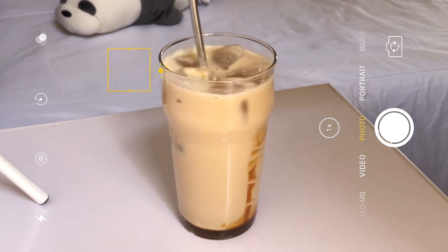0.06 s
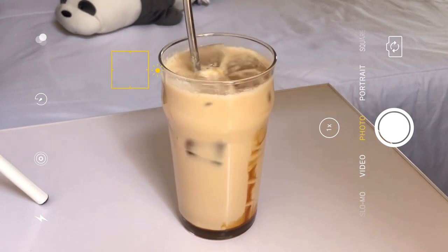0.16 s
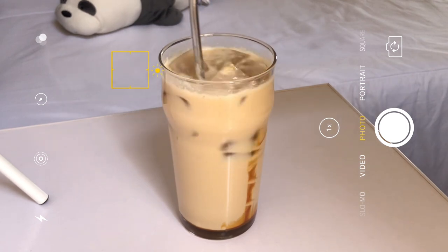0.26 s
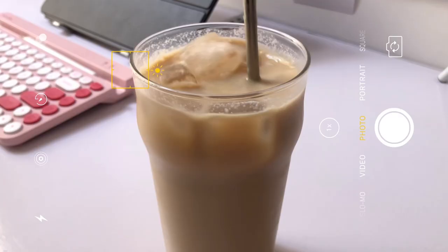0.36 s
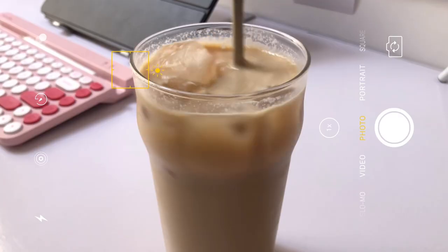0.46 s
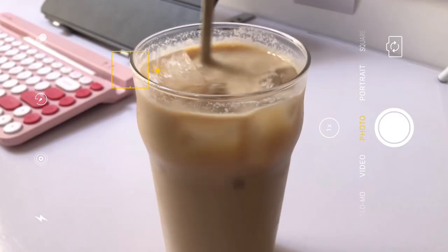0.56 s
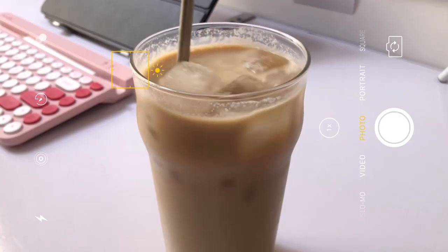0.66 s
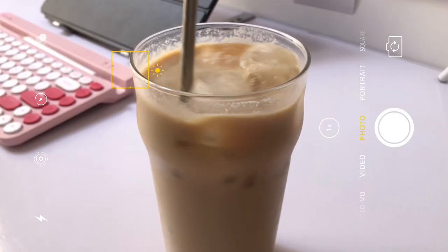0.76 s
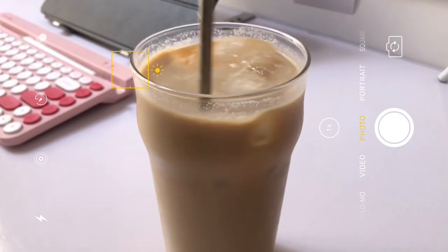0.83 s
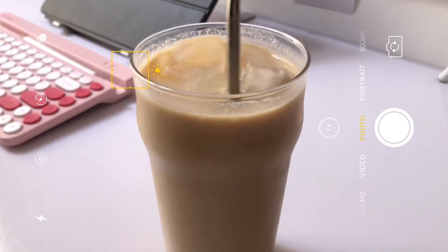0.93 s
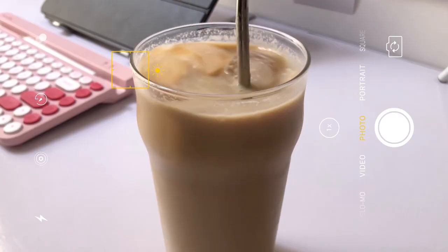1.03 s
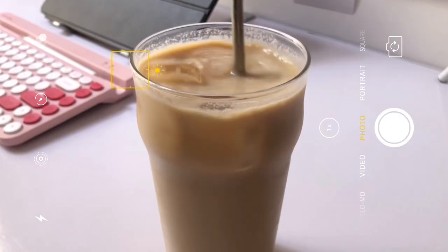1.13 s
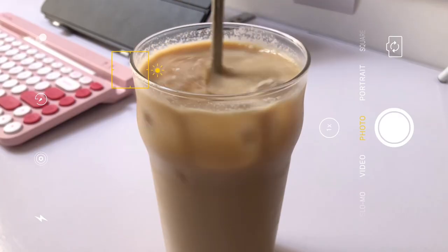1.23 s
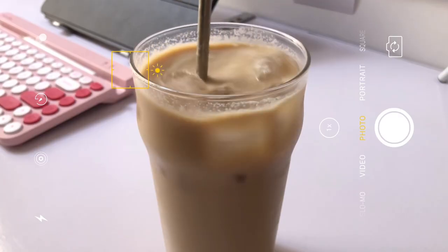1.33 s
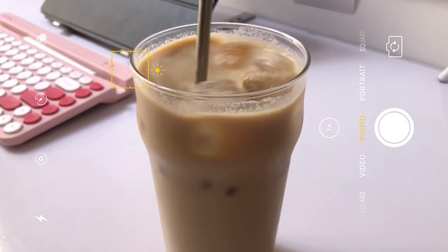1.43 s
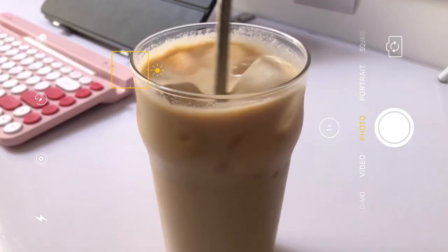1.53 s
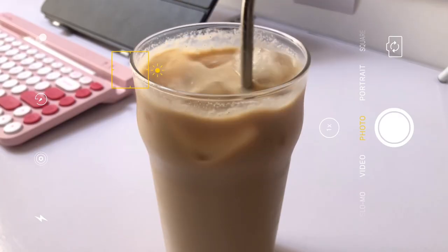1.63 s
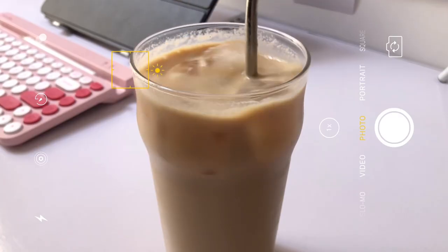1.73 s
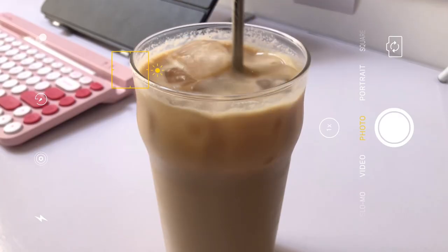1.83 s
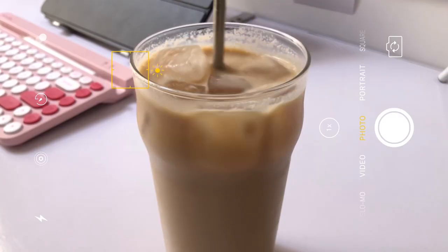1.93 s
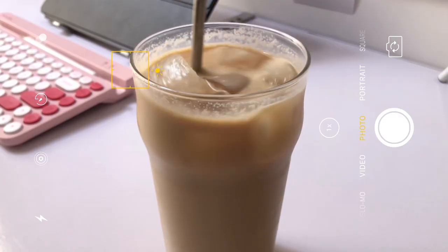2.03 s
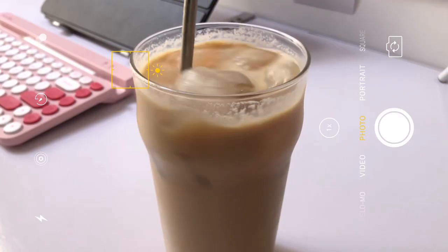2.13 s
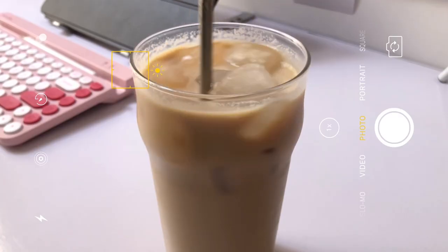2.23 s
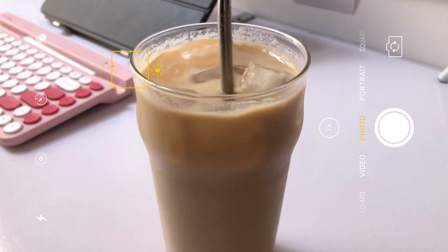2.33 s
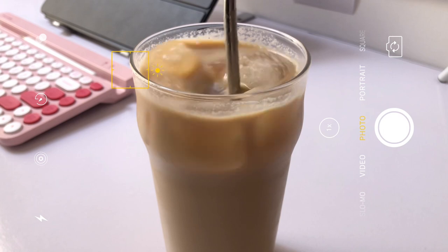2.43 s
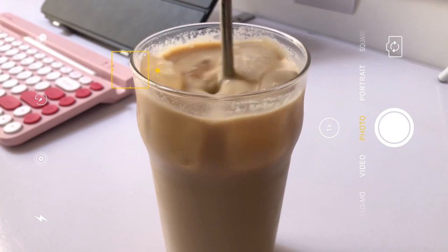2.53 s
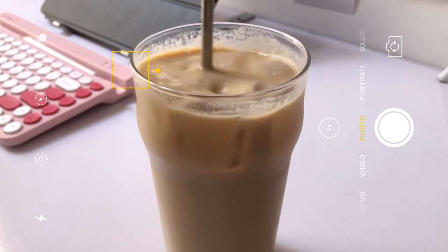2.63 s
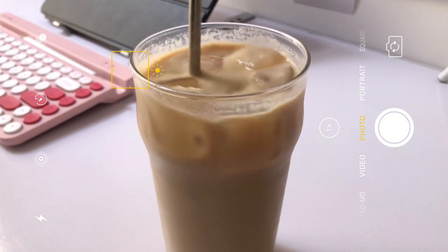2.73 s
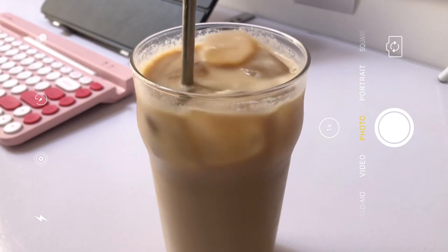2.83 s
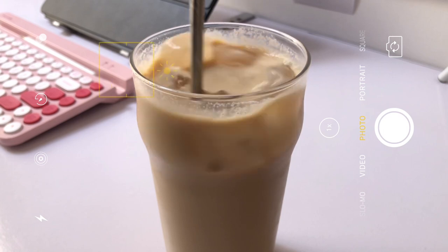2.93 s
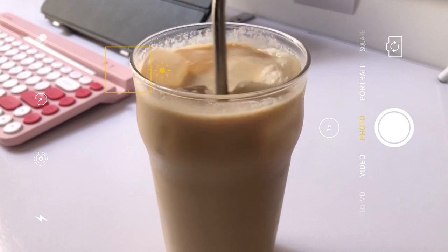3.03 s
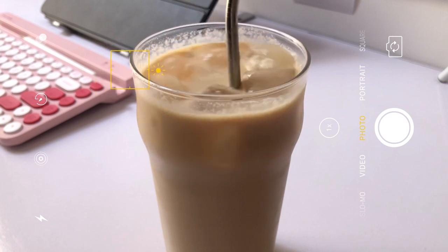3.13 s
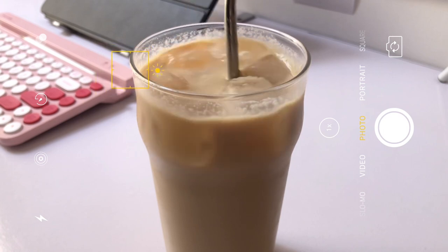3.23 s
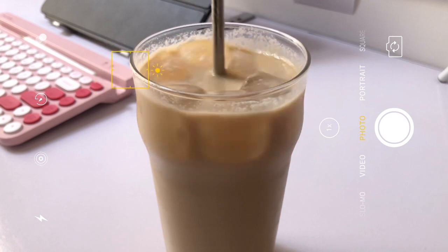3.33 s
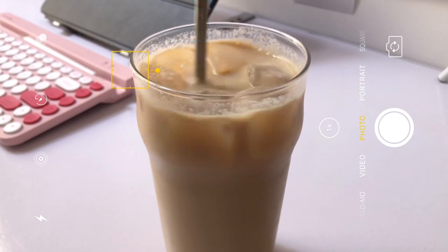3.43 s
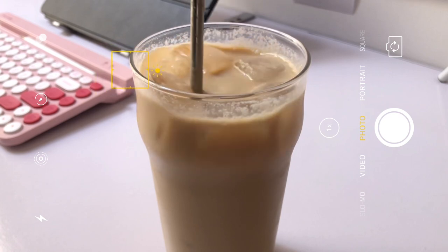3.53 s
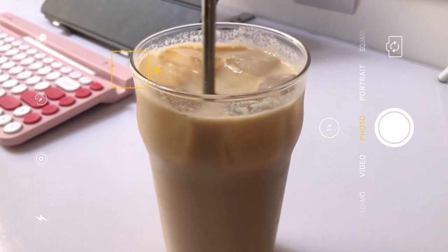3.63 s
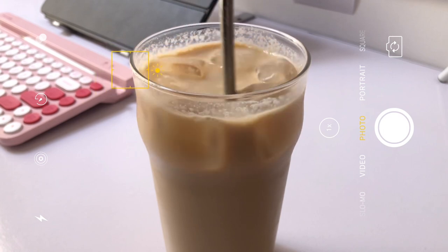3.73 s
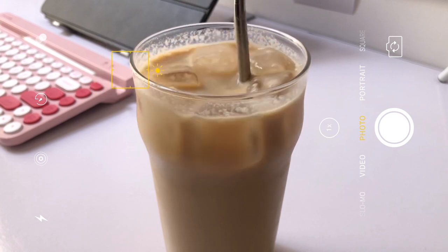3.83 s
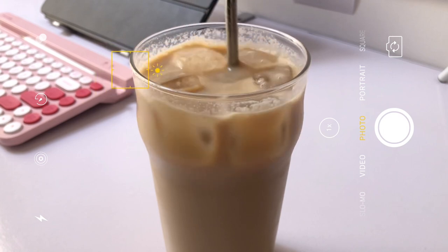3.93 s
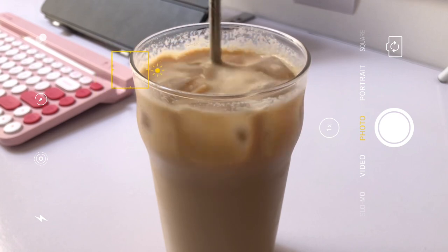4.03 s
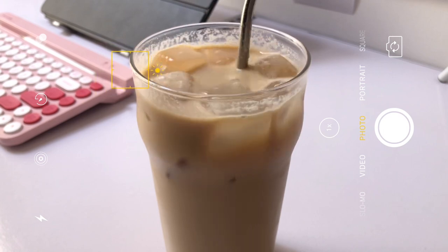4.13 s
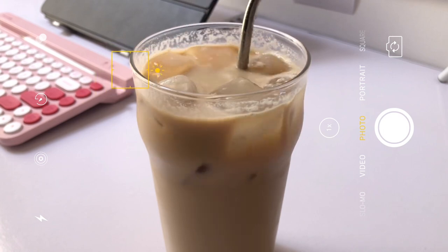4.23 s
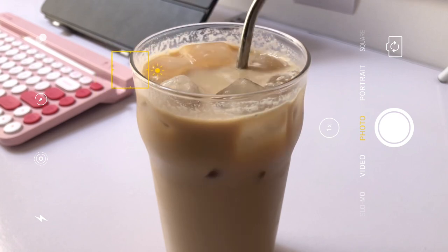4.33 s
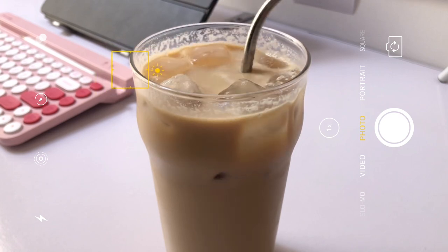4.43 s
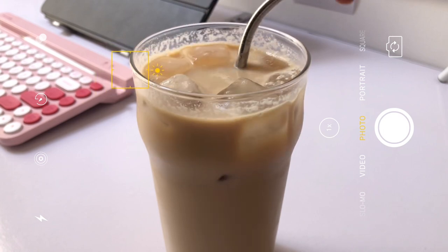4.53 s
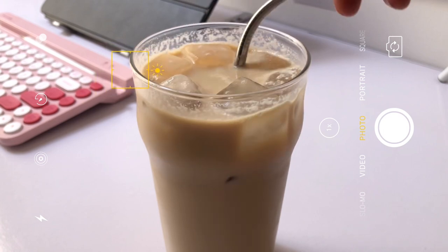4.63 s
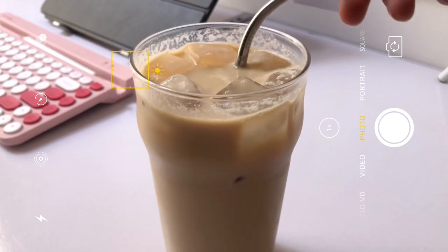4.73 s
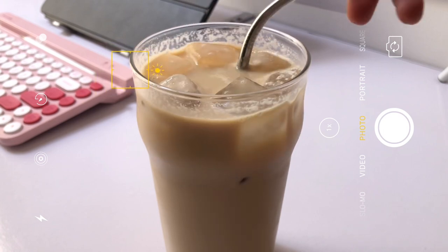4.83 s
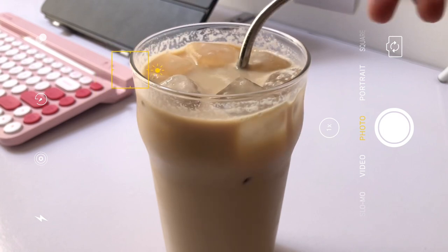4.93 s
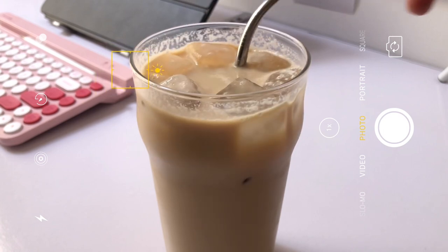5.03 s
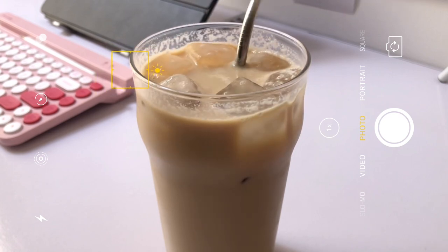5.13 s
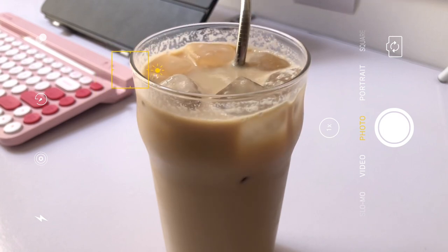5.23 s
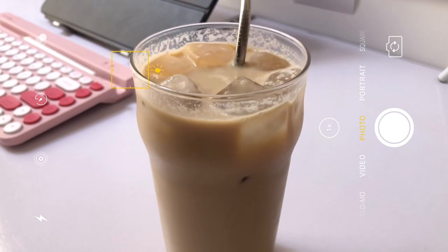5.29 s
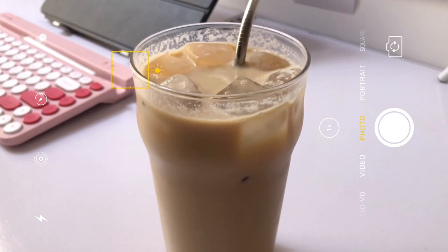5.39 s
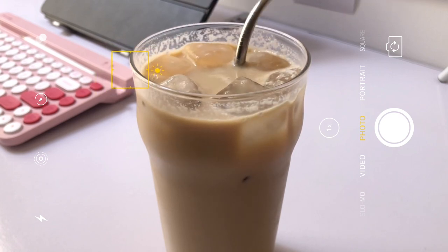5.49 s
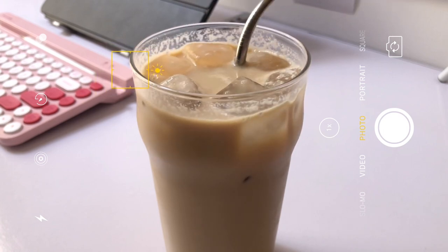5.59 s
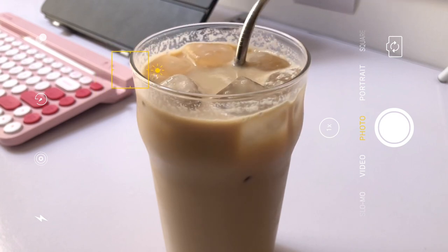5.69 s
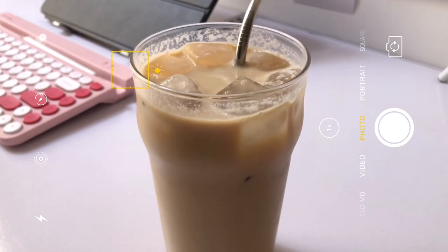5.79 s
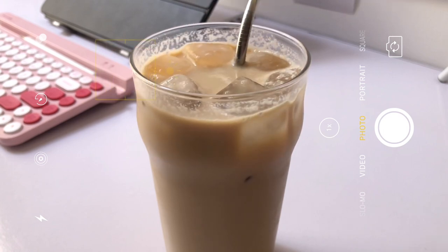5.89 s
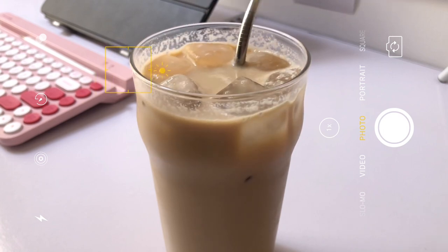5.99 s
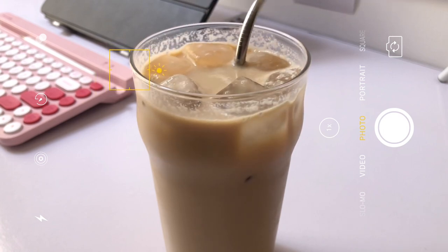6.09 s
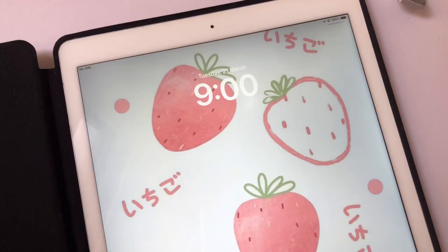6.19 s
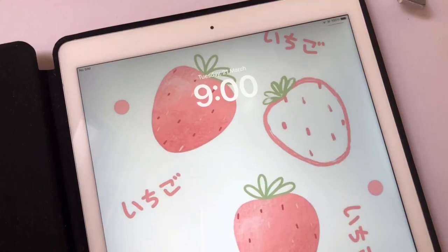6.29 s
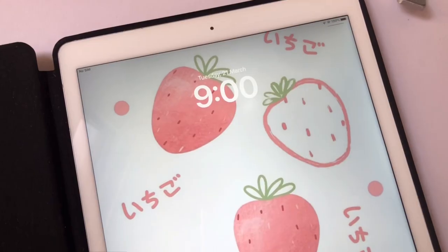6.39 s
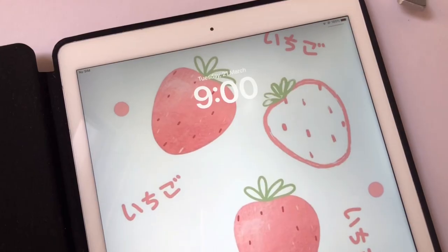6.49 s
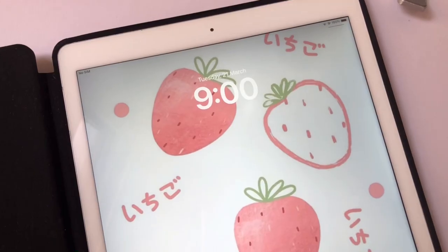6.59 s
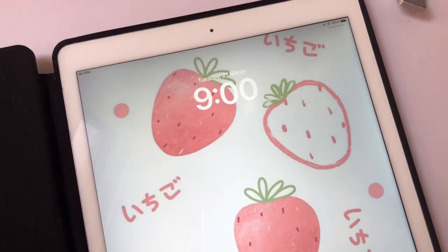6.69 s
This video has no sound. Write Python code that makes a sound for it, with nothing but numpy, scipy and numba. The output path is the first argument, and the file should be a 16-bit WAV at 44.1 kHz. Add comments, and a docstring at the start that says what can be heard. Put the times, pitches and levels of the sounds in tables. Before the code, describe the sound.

Close, crisp ice and straw clicks against a full glass, with light slosh and dull desk bumps, ending in quiet room air.

```python
"""On a desk in a quiet room, a metal straw stirs ice cubes in a full glass of milky coffee.
Each knock is a noisy crack of short modes plus the damped modes of glass, liquid and straw.
Harder shoves ring the desk; faint touches, filtered slips and noise make jostle, scrape and slosh.
The level dips briefly near 0.39 s, where the pitch of the hollow steps down.
The stirring stops, filtered noise brushes and squeaks as fingers do, and steady air remains."""
import sys
import numpy as np
from scipy import signal
from scipy.fft import rfft, irfft
from scipy.io import wavfile
from scipy.ndimage import uniform_filter1d
from numba import njit

SR = 44100
rng = np.random.default_rng(int(sys.argv[2]) if len(sys.argv) > 2 else 0)


def how_loud(loudness_db):
    """Turn decibels into a plain amplitude multiplier (0 dB gives 1, 20 dB gives 10)."""
    steps = np.asarray(loudness_db, float) / 20
    return 10 ** steps


def put_to_file(sound):
    """Save the sound as 16-bit audio at rate SR, in the file named by the first command-line argument."""
    columns = np.atleast_2d(sound).T  # one column per channel
    safe = np.clip(columns, -1, 1)
    whole_steps = np.round(safe * 32767)
    wavfile.write(sys.argv[1], SR, whole_steps.astype(np.int16))


N = 297671
T = np.arange(N) / SR


def curve(s, v, off=-120.):
    """Linear interpolation: a control curve at every sample, at the level off outside its span."""
    return np.interp(T, s, v, left=off, right=off)


def coloured(shape):
    """Spectral shaping: noise of rms 1 whose spectrum follows (frequency [Hz], relative level [dB])."""
    hz, db = np.transpose(shape)
    f = np.maximum(np.fft.rfftfreq(N, 1 / SR), 1)
    gain = how_loud(np.interp(np.log(f), np.log(hz), db, left=-80, right=-80))
    x = irfft(rfft(rng.standard_normal(N)) * gain, N)
    return x / np.std(x)


def walk(rate):
    """Slow random modulation: levels held for 1 / rate s, then smoothed twice; spread near 1."""
    k = int(SR / rate)
    held = np.repeat(rng.standard_normal(N // k + 1), k)
    return 1.5 * uniform_filter1d(uniform_filter1d(held, k), k)[:N]


@njit
def rings(s, hz, gain, t60, n, sr):
    """Modal superposition: a sum of damped sines, each starting at its own moment."""
    out = np.zeros(n)
    for j in range(len(s)):
        p = np.exp(2j * np.pi * hz[j] / sr - np.log(1000) / (t60[j] * sr))
        z, i0 = gain[j] + 0j, int(s[j] * sr)
        for i in range(i0, min(n, i0 + int(t60[j] * sr))):
            out[i] += z.imag
            z *= p
    return out


@njit
def sweep(x, hz, q, sr):
    """Resonance with a moving centre: a state-variable band-pass."""
    y, b, l = np.empty(len(x)), 0., 0.
    for i in range(len(x)):
        g = np.tan(np.pi * hz[i] / sr)
        v = (b + g * (x[i] - l)) / (1 + g * (g + 1 / q))
        b, l, y[i] = 2 * v - b, l + 2 * g * v, v / q
    return y


def band(x, hz, q):
    """Resonant filtering: band-passed sound brought back to rms 1."""
    y = sweep(x, hz + np.zeros(N), q, float(SR))
    return y / np.std(y)


def strike(s, hz, db, t60, scatter_db, detune, lag_s=0., unison=0.):
    """Modal excitation: blows (rows) ring modes (columns); contact varies sign, level, tuning and lag."""
    hz, db, t60 = np.broadcast_arrays(hz, db, t60)
    u = rng.standard_normal(hz.shape + (4,))
    start = s[:, None] + lag_s * np.abs(u[..., 3])
    hz = np.clip(hz * (1 + detune * u[..., 0]), 30, .45 * SR)
    # a larger unison gives more modes the same sign
    gain = how_loud(db + scatter_db * u[..., 1]) * np.sign(u[..., 2] + unison)
    return rings(start.ravel(), hz.ravel(), gain.ravel(), t60.ravel() + 0., N, float(SR))


# blows of straw and ice on the glass: (time [s], relative crack level [dB], crack centre [Hz],
# relative wall level [dB], wall pitch [Hz], relative bowl level [dB])
KNOCK_BLOWS = [(0.0094, -54, 4590, -53, 2620, -53), (0.0224, -52, 4900, -52, 2950, -53),
               (0.0434, -37.5, 5080, -47.5, 3050, -45), (0.0535, -40, 8090, -45.5, 3230, -50),
               (0.1238, -37.5, 5470, -39, 3000, -45.5), (0.1331, -31, 5170, -56, 3230, -67),
               (0.1896, -37.5, 5260, -42, 3030, -50.5), (0.2106, -43, 4200, -45, 2910, -53),
               (0.2892, -60, 4840, -64, 2980, -52), (0.4297, -52, 4840, -55, 2950, -56.5),
               (0.4584, -32.5, 6200, -42, 3060, -54), (0.4823, -39.5, 6270, -38, 2990, -50),
               (0.5192, -48, 4320, -48, 2930, -61), (0.5357, -38, 6340, -40.5, 3000, -57),
               (0.5594, -17, 7560, -47, 3070, -47.5), (0.5901, -45, 7700, -40.5, 3030, -57),
               (0.6954, -42.5, 4750, -50.5, 3080, -58), (0.7018, -35.5, 4850, -52.5, 2980, -55.5),
               (0.7213, -44, 4280, -57, 2990, -60), (0.7324, -48, 6200, -63, 3220, -67),
               (0.7662, -44, 6400, -42.5, 2940, -60), (0.9108, -52, 6400, -60, 3050, -61.5),
               (1.0635, -48, 6200, -47, 2940, -58), (1.0766, -44.5, 6330, -43, 2970, -55),
               (1.0794, -35.5, 4170, -42.5, 3090, -53), (1.0939, -42, 6200, -43, 2940, -56),
               (1.1333, -40.5, 4600, -35, 2775, -55), (1.1478, -31.5, 4260, -41, 2850, -52),
               (1.1603, -35.5, 6060, -34.5, 2930, -46.5), (1.1862, -38, 4250, -40, 2950, -47),
               (1.29, -50.5, 4750, -46.5, 2850, -63), (1.3276, -51, 5450, -47, 3300, -55),
               (1.3319, -41, 5100, -41.5, 3060, -53), (1.4172, -37, 4240, -46, 3130, -55),
               (1.4267, -34.5, 4180, -43, 2920, -52), (1.4386, -24.5, 5860, -34.5, 2950, -52),
               (1.4568, -39, 6420, -41, 3020, -54), (1.473, -40, 4200, -41.5, 3050, -60),
               (1.4914, -37.5, 4260, -44, 2850, -71), (1.502, -36.5, 6850, -44.5, 3220, -60),
               (1.5105, -34, 6450, -46.5, 3030, -54), (1.5499, -17, 8350, -38.5, 3070, -48),
               (1.5713, -34.5, 4400, -40, 2940, -51), (1.6084, -41, 4400, -44.5, 2860, -51.5),
               (1.6328, -32, 4330, -34.5, 2975, -46.5), (1.6586, -47, 4230, -46.5, 2990, -57),
               (1.7001, -40, 4700, -50, 2910, -60), (1.7215, -34, 4600, -41.5, 3060, -56),
               (1.7669, -44, 4750, -45, 3070, -53), (1.7838, -44, 4270, -39.5, 3000, -50.5),
               (1.8287, -37, 4300, -41.5, 3010, -53), (1.9205, -34, 6270, -37.5, 3114, -54.5),
               (2.1034, -41.5, 6600, -46.5, 3010, -52.5), (2.1136, -33.5, 4540, -47, 3020, -65),
               (2.2363, -34, 6000, -62, 3260, -66), (2.385, -34.5, 6000, -48, 2930, -52.5),
               (2.4234, -52, 4250, -51, 2850, -53.5), (2.4848, -25, 4770, -29, 3070, -42.5),
               (2.4974, -43, 5500, -43, 2910, -56), (2.5107, -38, 4510, -38.5, 2830, -50),
               (2.5247, -19, 4540, -27.5, 3125, -43.5), (2.54, -39, 4610, -41.5, 2980, -49),
               (2.5591, -36, 4500, -39.5, 2980, -47), (2.617, -37, 4930, -55, 3080, -59),
               (2.6214, -29, 6400, -33.5, 2950, -48), (2.6489, -46, 5770, -39, 3090, -46.5),
               (2.6709, -27.5, 5940, -34.5, 2480, -46.5), (2.6848, -32, 4430, -35, 3130, -52.5),
               (2.6884, -28.5, 4220, -32, 3005, -58), (2.7004, -41, 4290, -50, 2870, -50),
               (2.7174, -49, 6140, -45, 2820, -48), (2.7752, -33.5, 4230, -40.5, 2970, -55),
               (2.862, -46, 4230, -45.5, 3000, -71), (2.9138, -54, 6320, -69, 2760, -67),
               (2.9277, -27.5, 6740, -50, 2640, -65), (2.9374, -44, 5550, -46.5, 2650, -52),
               (2.9781, -34, 6100, -29, 3060, -47), (3.0507, -37, 4360, -45.5, 3130, -59),
               (3.125, -46, 4320, -41, 2940, -51.5), (3.241, -45, 5530, -50.5, 3110, -53),
               (3.3024, -43, 6300, -44, 3000, -52), (3.3198, -53, 5690, -40, 2960, -53),
               (3.3283, -32, 6000, -35.5, 3250, -45.5), (3.3423, -28.5, 5930, -29.5, 2950, -56),
               (3.3569, -41, 5920, -45.5, 3060, -54), (3.4002, -30, 4400, -41.5, 2980, -49.5),
               (3.4164, -35, 4340, -40.5, 3100, -52), (3.4371, -38, 4600, -37.5, 2980, -52),
               (3.4625, -52, 5700, -50, 2920, -64), (3.4815, -24, 7900, -32, 2980, -44),
               (3.494, -18.5, 7920, -31, 2870, -50), (3.5086, -33, 5600, -37, 3240, -62),
               (3.5114, -29, 5550, -35, 2930, -46), (3.5309, -30, 5530, -48.5, 2980, -68),
               (3.5414, -36, 4500, -40.5, 2970, -67), (3.5657, -45, 4260, -45.5, 3250, -59),
               (3.5892, -42, 5540, -50, 2940, -60), (3.6022, -36, 5600, -46.5, 2950, -61),
               (3.6197, -41, 4970, -44, 2990, -51), (3.6331, -30.5, 4550, -39.5, 2980, -51),
               (3.677, -25.5, 4630, -37.5, 2980, -59), (3.6955, -50, 4400, -45, 3040, -57),
               (3.7264, -42.5, 6290, -40.5, 3060, -56), (3.7454, -24, 5700, -40, 3010, -53),
               (3.8182, -28.5, 4660, -34.5, 3020, -63), (3.8417, -22.5, 6560, -35.5, 3080, -50),
               (3.8821, -25.5, 6230, -27, 2997, -47), (3.904, -26, 6400, -30.5, 2936, -45.5),
               (3.9804, -47, 6170, -49, 2990, -53.5), (4.0382, -46, 7900, -45.5, 3010, -60.5),
               (4.0502, -41.5, 6130, -44.5, 3030, -59), (4.0632, -29.5, 6200, -39.5, 2920, -51),
               (4.1031, -47, 6170, -48, 3140, -60), (4.1718, -22.5, 6080, -37, 2970, -47),
               (4.2023, -48, 5630, -63, 3060, -58), (4.2506, -59, 5960, -64, 3070, -60),
               (4.435, -49.5, 6100, -43.5, 3030, -59), (4.4488, -34.5, 4900, -41, 2700, -54),
               (4.4554, -39.5, 8050, -47, 2680, -52.5), (4.4604, -48, 5320, -45, 2660, -57),
               (4.5331, -44.5, 7500, -48.5, 2900, -55), (4.5464, -60, 6660, -46.5, 3035, -54),
               (4.5585, -47, 4730, -45.5, 2993, -59), (4.7264, -63, 4740, -73, 3100, -69),
               (4.7626, -62, 6320, -62.5, 2980, -75), (4.8244, -67, 6050, -71, 2980, -82),
               (5.0394, -45.5, 6170, -47.5, 3020, -60.5)]


def knocks():
    """Impact excitation: the blows one can point at; some leave the straw singing."""
    s, crack_db, crack_hz, ring_db, ring_hz, bowl_db = np.transpose(KNOCK_BLOWS)
    return clinks(s, crack_db - 5.0, crack_hz, ring_db + 4.0, ring_hz, bowl_db + 5.0) + loose_straw()


# blows that catch the straw where fingers and liquid do not damp it:
# (time [s], relative level [dB], favoured frequency [Hz])
LOOSE_STRAW_BLOWS = [(0.053, -76, 8000), (.5595, -58, 8000), (4.172, -53.5, 5800), (4.449, -66, 13000),
                     (4.535, -64, 7800)]
# modes of the undamped straw: (frequency [Hz], relative level [dB], t60 [s])
LOOSE_STRAW_MODES = [(5570, -1, .2), (5690, -3.5, .15), (6150, -3.5, 0.11), (7750, -0.5, .12),
                     (7600, -0.5, 0.061), (8130, -4.5, .13), (10400, 2, .1), (14600, -2, .12)]


def loose_straw():
    """Weakly damped modes: each blow chatters three times and favours the modes near one frequency."""
    s, blow_db, favoured_hz = np.repeat(LOOSE_STRAW_BLOWS, repeats=3, axis=0).T[:, :, None]
    hz, db, t60 = np.transpose(LOOSE_STRAW_MODES)
    fall_db = 30 * np.abs(np.log2(hz / favoured_hz))  # 30 dB per octave
    return strike(s[:, 0], hz, blow_db + db - fall_db, t60, 1.9, .009, lag_s=.008)


def clinks(s, crack_db, crack_hz, ring_db, ring_hz, bowl_db):
    """Contact followed by free vibration: the crack, then the modes of wall, bowl and straw."""
    crack_db, crack_hz, ring_db, ring_hz, bowl_db = (
        c[:, None] for c in (crack_db, crack_hz, ring_db, ring_hz, bowl_db))
    out = crack(s, crack_db, crack_hz) + wall_ring(s, ring_db, ring_hz)
    return out + bowl_ring(s, bowl_db) + straw_ring(s, crack_db, crack_hz)


def treble(hz, crack_db, crack_hz):
    """Contact stiffness: a harder contact has a higher centre; soft ones fall off faster above it."""
    octaves = np.log2(hz / crack_hz)
    db_per_octave = np.where(octaves > 0, 9.25 * (6000 / crack_hz) ** 0.88, 7.0)
    return crack_db - db_per_octave * np.abs(octaves)


def crack(s, crack_db, crack_hz):
    """Broadband impact: a spray of very short modes in ice and contact, chattering for a few ms."""
    spray_hz = np.geomspace(2000, 16000, 16)
    spray_db = treble(spray_hz, crack_db, crack_hz)
    out = strike(s, spray_hz, spray_db - 6.0, 0.0058, 2.1, 0.07, lag_s=0.00024, unison=0.77)
    out += strike(s + 0.00059, spray_hz, spray_db - 15.0, 0.005, 5.0, .06, lag_s=.004)
    # the struck cube sings its own short, rough note at the centre of the crack
    return out + strike(s, crack_hz * np.ones(3), crack_db - 10.5, 0.009, 2.6, 0.0082, lag_s=.001)


# wall of the filled glass: (ratio to the wall pitch [1], relative level [dB], t60 [s])
WALL_MODES = [(1.0, 3, 0.028), (0.81, -13, 0.027), (1.035, -3.5, 0.019), (0.69, -24.5, 0.049)]


def wall_ring(s, ring_db, ring_hz):
    """Beating of close modes in the wall of the filled glass."""
    ratio, db, t60 = np.transpose(WALL_MODES)
    out = strike(s, ring_hz * ratio, ring_db + db - 2.5, t60, 0.46, 0.014, lag_s=.0012)
    # the cube settles against the wall and keeps its note fluttering
    return out + strike(s, ring_hz * np.ones(4), ring_db - 15.5, 0.021, 2.9, .025, lag_s=.012)


# air above the liquid, before and after the start of the dip:
# (frequency [Hz], relative resonance level [dB], relative wash level [dB])
HOLLOW_STATES = [(905, 9.5, -2.5), (763.3, 6.5, -2)]
# span of the brief dip in level: (start [s], end [s])
DIP_S = (0.389, 0.3954)


def hollow(s):
    """Cavity resonance: pitch, strength and wash of the air above the liquid at given times."""
    return np.array(HOLLOW_STATES, float)[(s > DIP_S[0]).astype(int)].T


# low modes of glass and liquid: (frequency before any tilt [Hz], relative level [dB], t60 [s])
BOWL_MODES = [(400.5, -15, 0.32), (756, -1.5, 0.057), (803, -15.5, 0.16), (1748, 2.5, 0.024)]


def bowl_ring(s, bowl_db):
    """Coupled modes: those below 1000 Hz follow the hollow; a dull clunk of ice fills in between."""
    tilt = hollow(s)[0][:, None] / BOWL_MODES[1][0]
    hz, db, t60 = np.transpose(BOWL_MODES)
    mode_hz = hz * np.where(hz < 1000, tilt, 1)
    out = strike(s, mode_hz, bowl_db + db - 3.0, t60, 1.0, .02, lag_s=0.001523)
    clunk_hz = np.geomspace(300, 2500, 8)
    return out + strike(s, clunk_hz, bowl_db - 17.0, 0.024, 1.0, 0.088, lag_s=0.002063)


# high modes of straw, ice and rim: (frequency [Hz], relative level [dB], t60 [s])
STRAW_MODES = [(4020, -6.5, 0.018), (4500, -6.5, 0.013), (5587, -3.5, 0.0083), (6270, -5, 0.018),
               (6920, -15, 0.0067), (8080, -7.5, 0.022), (7480, -11, 0.0067), (9700, -5.5, 0.0094),
               (10550, -9, 0.014), (11120, -4, 0.0087), (13460, 2.5, 0.0039), (14650, 1.5, 0.0081)]


def straw_ring(s, crack_db, crack_hz):
    """Modal filtering: high modes of straw, ice and rim take their levels from the contact's spectrum."""
    hz, db, t60 = np.transpose(STRAW_MODES)
    return strike(s, hz, treble(hz, crack_db, crack_hz) + db - 0.5, t60, 1.5, .01, lag_s=0.0006)


# course of the stirring: (time [s], relative jostle level of the ice [dB], relative slosh level [dB])
STIR_COURSE = [(0.0, -64, -54), (0.12, -63, -55.5), (0.26, -68.5, -62.5), (0.67, -69.5, -68.5),
               (0.76, -72, -68.5), (0.97, -66.5, -63), (1.34, -63, -61.5), (1.61, -55.5, -59.5),
               (1.71, -54, -58), (1.87, -59.5, -63), (2.03, -66.5, -65), (2.17, -59.5, -59.5),
               (2.43, -78, -60), (2.57, -61, -57), (2.65, -55, -60), (2.76, -64, -65.5), (3.08, -58, -62.5),
               (3.32, -74, -62.5), (3.51, -67.5, -62), (3.9, -54, -66), (4.07, -65.5, -62.5),
               (4.23, -78, -72), (4.9, -91, -79.5)]


def stirring():
    """Common drive: times, jostle levels and slosh levels shared by ice, liquid and desk."""
    return np.transpose(STIR_COURSE)


def jostle():
    """Random impacts: many faint touches of cube on cube and wall, stronger as the ice moves."""
    u = rng.random((1100, 4))
    s, jostle_db, _ = stirring()
    when = s[-1] * u[:, 0]
    size_db = np.interp(when, s, jostle_db) - 6.5 - 3.11 * np.log(u[:, 1])
    crack_hz, ring_hz = 4800 + 2200 * u[:, 3], 2860 + 240 * u[:, 2]
    return clinks(when, size_db - 1.5, crack_hz, size_db, ring_hz, size_db - 5.0)


# resonances of the glass under dragging ice: (frequency [Hz], width [Hz], relative level [dB])
SCRAPE_BANDS = [(1710, 200, -9.5), (2980, 130, 2.5), (4280, 250, -12), (5600, 400, -12.5), (6270, 180, -13)]


def scrape():
    """Stick-slip friction: cubes drag along the wall, a crunchy stream of slips through resonances."""
    s, jostle_db, _ = stirring()
    slips = rng.standard_normal(N) * how_loud(6.1 * rng.exponential(size=N) + 8.2 * walk(60))
    tone = sum(how_loud(db) * band(slips, hz, hz / width) for hz, width, db in SCRAPE_BANDS)
    return how_loud(curve(s, jostle_db) - 11.0) * tone


# spectrum of the wash: (frequency [Hz], relative level [dB])
SLOSH_SPECTRUM = [(120, -11.5), (190, -4), (400, -4.5), (780, -4.5), (1750, -10), (3000, -8.5),
                  (6000, -26.5), (16000, -30.5)]


def slosh():
    """Turbulence and cavity resonance: a fluttering wash with a hollow tone, and short gurgles."""
    s, _, slosh_db = stirring()
    hz, tone_db, wash_db = hollow(T)
    wash = coloured(SLOSH_SPECTRUM) * how_loud(2.8 * walk(30))
    tone = sweep(wash, hz * (1 + .03 * walk(12)), 2.7, float(SR))
    u = rng.random((400, 3))
    when, pitch_hz = s[-1] * u[:, 0], 400 * 4.0 ** u[:, 1:2]
    size_db = np.interp(when, s, slosh_db)[:, None] - 4.5 - 0.91 * np.log(u[:, 2:])
    gurgle = strike(when, pitch_hz, size_db, 14.0 / pitch_hz, 1.0, 0.011)
    return how_loud(curve(s, slosh_db) - 4.0) * (how_loud(wash_db) * wash + how_loud(tone_db) * tone) + gurgle


# shoves that reach the desk: (time [s], relative level [dB], pitch [Hz])
DESK_SHOVES = [(0.05, -49.5, 79.7), (0.563, -47, 178), (0.701, -45.5, 170.5), (0.833, -52, 142),
               (0.971, -48, 190), (1.272, -54, 145), (1.548, -46, 152), (1.644, -40.5, 152),
               (2.42, -41.5, 164), (2.477, -39, 180), (2.561, -45, 77), (2.931, -48, 167),
               (2.989, -47.5, 172), (3.246, -55.5, 141), (3.349, -49, 157), (3.529, -40.5, 107),
               (3.56, -48, 80), (3.852, -42.5, 164), (3.922, -41.5, 139), (3.959, -49, 72),
               (4.048, -49, 169), (4.179, -39, 117.6), (4.452, -36, 331), (4.25, -48, 75),
               (4.454, -34.5, 172.7)]
# modes of the desk top: (frequency [Hz], relative level [dB], t60 [s])
DESK_MODES = [(78.1, -13, 0.31), (116.05, -11.5, 0.95), (164, -3.5, 0.14), (343, -6, 0.094),
              (440, -11, 0.072), (545, -7.5, 0.085)]
# spectrum of the rumble: (frequency [Hz], relative level [dB])
RUMBLE_SPECTRUM = [(45, -17.5), (75, -7.5), (115, -2.5), (170, -4), (230, -13.5)]


def desk():
    """Structure-borne sound: shoves knock the desk top; the rocking glass keeps it rumbling."""
    s, shove_db, hz = np.transpose(DESK_SHOVES)
    modes_hz, db, t60 = np.transpose(DESK_MODES)
    push_hz, push_db = hz[:, None] * [1, 1.3], shove_db[:, None] - [9.0, 16.0]
    push = strike(s, push_hz, push_db, 37.6 / hz[:, None], 0.5, 0.0083)
    knock = strike(s, modes_hz, shove_db[:, None] + db - 5.0, t60, 0.44, 0.02, lag_s=.003)
    s, _, slosh_db = stirring()
    # -64 dB at a tabled slosh of -60.5 dB, moving 0.65 dB per dB of slosh
    rumble_db = curve(s, -64 + 0.65 * (slosh_db + 60.5)) + 2.2 * walk(12)
    return push + knock + how_loud(rumble_db) * coloured(RUMBLE_SPECTRUM)


def arch(start, length):
    """Amplitude envelope: a stroke swells to its middle and fades to 15 dB down at its ends."""
    p = 2 * (T - start) / length - 1
    return how_loud(-15 * p ** 2) * (np.abs(p) < 1)


# strokes of skin on straw or desk: (start [s], length [s], rustle level [dB])
BRUSH_STROKES = [(5.111, .17, -71.5), (5.398, .12, -78), (6.555, 0.062, -74), (6.63, 0.36, -65)]
# what a rub sets ringing: (start [s], level [dB], fade [dB/s], frequency [Hz], width [Hz])
RUBBED_RINGS = [(2.125, -67, 150, 5650, 200), (5.115, -60.5, 250, 5570, 182.4), (5.11, -67, 300, 4350, 200),
                (5.14, -74, 200, 2850, 200), (5.44, -68.5, 250, 876, 37.1), (6.56, -61, 400, 695, 130),
                (6.67, -65.5, 5, 847, 31.48)]
# gliding squeaks: (start [s], length [s], level [dB], start frequency [Hz], end frequency [Hz])
SKIN_SQUEAKS = [(5.095, .1, -70, 4650, 2300), (6.64, 0.17, -80, 1900, 1870)]
# spectrum of the rustle: (frequency [Hz], relative level [dB])
RUSTLE_SPECTRUM = [(400, 5), (900, -3.5), (2500, -3), (6000, -6), (9000, -24), (16000, -12)]


def brush():
    """Skin friction: a grainy rustle, a breathy squeak that glides, and the ring of what is rubbed."""
    rub = coloured(RUSTLE_SPECTRUM) * how_loud(0.63 * walk(140))
    out = sum(how_loud(db) * arch(start, length) * rub for start, length, db in BRUSH_STROKES)
    for start, db, fade, hz, width in RUBBED_RINGS:
        since = np.maximum(T - start, 0)
        attack = np.minimum(since / 0.012, 1)  # 12 ms rise
        out = out + attack * how_loud(db - fade * since) * band(rub, hz, hz / width)
    for start, length, db, from_hz, to_hz in SKIN_SQUEAKS:
        glide_hz = np.interp(T, [start, start + length], [from_hz, to_hz])
        out = out + how_loud(db) * arch(start, length) * band(rub, glide_hz, 3.6)
    return out


def room(x):
    """Reverberation: a small furnished room adds a decaying noise tail, duller than the direct sound."""
    t60_s, tail_db = 0.25, -17.5
    t = np.arange(int(.4 * SR)) / SR
    tail = rng.standard_normal(len(t)) * how_loud(-60 * t / t60_s) * (t > .003)
    tail = signal.lfilter([1], [1, -.4], tail)
    tail = tail / np.sqrt(np.sum(tail ** 2))
    return x + how_loud(tail_db) * signal.fftconvolve(x, tail)[:N]


# spectrum of the room air: (frequency [Hz], relative level [dB])
AIR_SPECTRUM = [(21, -28.5), (35, -4.5), (117, -6.5), (143, -9.5), (351, -17), (543, -21), (819, -25.5),
                (2660, -33.5), (2870, -34.5), (3270, -34.5), (16000, -40.5)]


def air():
    """Stationary background noise: room air near -65 dB rms, wavering slightly."""
    return how_loud(-65 + walk(3) / 2) * coloured(AIR_SPECTRUM)


def scene():
    """Linear superposition: all near sources in the room, over its steady air."""
    near = knocks() + jostle() + scrape() + slosh() + desk() + brush()
    return (room(near) + air())[None]


def roll_off(x):
    """The treble ends steeply here."""
    return signal.sosfilt(signal.butter(12, 17090, fs=SR, output="sos"), x)


def record(dry):
    """Band limitation: the microphone sheds the deepest bass and the top; the level dips briefly once."""
    x = signal.sosfilt(signal.butter(3, 50, "highpass", fs=SR, output="sos"), dry)
    x = signal.sosfilt(signal.cheby1(8, .5, 16600, fs=SR, output="sos"), x)
    # gain falls to 0.03 inside the dip, with edges of about 2 ms
    dip = np.clip(np.maximum(DIP_S[0] - T, T - DIP_S[1]) / 0.0022, .03, 1)
    return roll_off(x * dip)


dry = scene()
out = record(dry)
put_to_file(out)
```